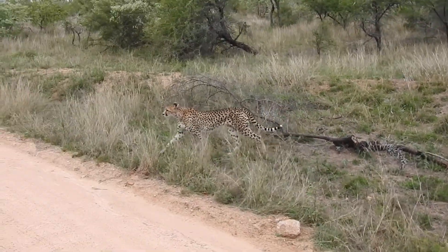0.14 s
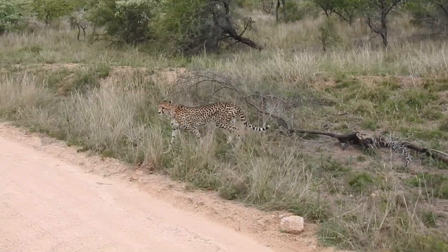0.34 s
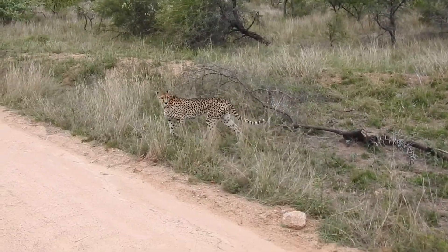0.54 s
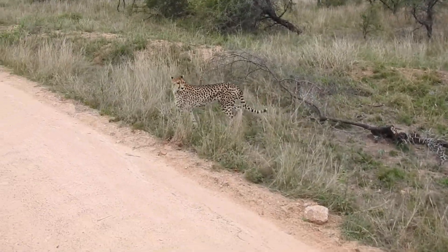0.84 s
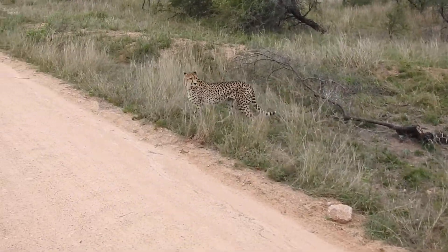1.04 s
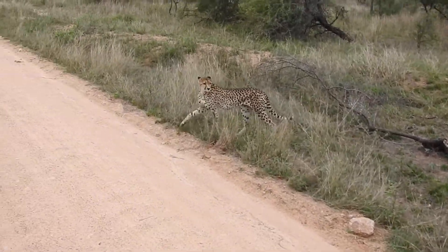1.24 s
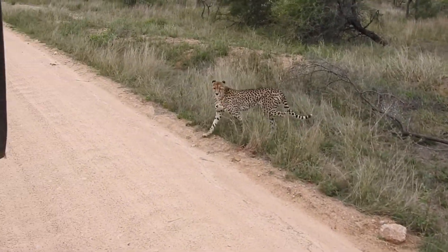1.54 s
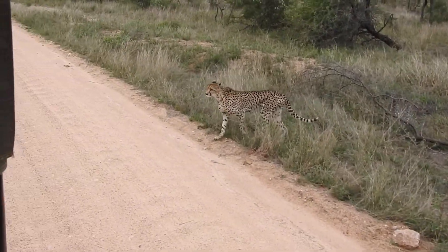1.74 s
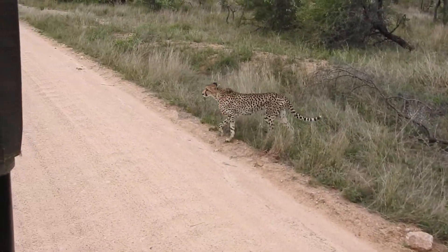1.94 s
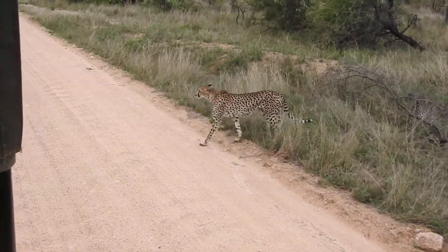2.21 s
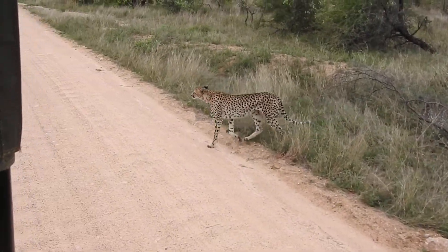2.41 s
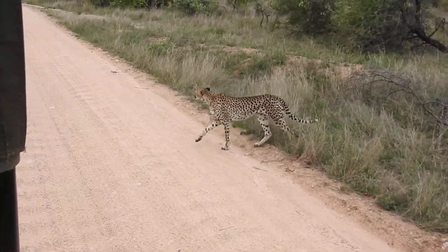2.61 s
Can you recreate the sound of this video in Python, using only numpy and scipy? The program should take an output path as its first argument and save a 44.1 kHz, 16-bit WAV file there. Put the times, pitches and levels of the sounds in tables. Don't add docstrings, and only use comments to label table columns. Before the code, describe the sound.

Thin, wavering, hoarse chirps from a cheetah close by, over a low idling diesel engine

```python
import sys
import numpy as np
from scipy import signal
from scipy.io import wavfile

SR = 44100
rng = np.random.default_rng(int(sys.argv[2]) if len(sys.argv) > 2 else 0)


def boost_factor(decibels):
    exponent = np.asarray(decibels, float) / 20
    return 10 ** exponent


def wav_record(signal):
    frames = np.transpose(np.atleast_2d(signal))
    bounded = np.clip(frames, -1, 1)
    quanta = np.round(bounded * 32767).astype(np.int16)
    wavfile.write(sys.argv[1], SR, quanta)


N = 122157


def rms_one(x):
    return x / np.sqrt(np.mean(np.abs(x) ** 2) + 1e-20)


def at_hz(points, hz):
    table_hz, value = np.array(points).T
    return np.interp(np.log(hz), np.log(np.maximum(table_hz, 1)), value)


def drift(rate_hz, size=N):
    r = np.exp(-2 * np.pi * rate_hz / SR)
    settle = SR // 2
    white = rng.standard_normal(size + settle)
    return rms_one(signal.lfilter([1], [1, -2 * r, r * r], white)[settle:])


def wobble(rate_hz, size):
    white = rng.standard_normal((2, size + 2000))
    low_pass = signal.butter(4, rate_hz, fs=SR, output="sos")
    real, imag = signal.sosfilt(low_pass, white)[:, 2000:]
    return rms_one(real + 1j * imag)


def resonance(x, hz, width_hz):
    r = np.exp(-np.pi * width_hz / SR)
    poles = [1, -2 * r * np.cos(2 * np.pi * hz / SR), r * r]
    return signal.lfilter([(1 - r * r) / 2, 0, (r * r - 1) / 2], poles, x)


def window(start, end, edge):
    t = np.arange(N) / SR
    return np.clip(np.minimum(t - start, end - t) / edge + .5, 0, 1)


def lean_gain(left_minus_right_db):
    half_db = left_minus_right_db / 2
    return boost_factor(np.array([[half_db], [-half_db]]))


def banded_noise(spectrum, patchy_db, likeness, leaning):
    edges = 30 * 2 ** np.arange(0, 9.6, .5)
    white = rng.standard_normal((2, 2, N))
    out = 0
    for k, (low, high) in enumerate(zip(edges, np.minimum(edges[1:], .45 * SR))):
        band = signal.butter(2, [low, high], "band", fs=SR, output="sos")
        mid, side = signal.sosfilt(band, white[k % 2])
        hz = np.sqrt(low * high)
        alike = np.clip(at_hz(likeness, hz), -1, 1)
        below_table_db = -60 * (hz < spectrum[0][0])
        gain = boost_factor(at_hz(spectrum, hz) + below_table_db + patchy_db * drift(11.8))
        pair = np.sqrt(1 + alike) * mid + np.sqrt(1 - alike) * side * [[1], [-1]]
        out = out + gain * lean_gain(at_hz(leaning, hz)) * pair
    return out


# pitch_hz, level_db
ROAD = [(60, 6.5), (170, -3.5), (500, -15), (1100, -16.5), (2500, -22.5), (7000, -22.5), (10000, -46.5),
        (15500, -74)]
# pitch_hz, left_right_likeness (-1 to 1)
ROAD_LIKENESS = [(60, 0.89), (150, 0.84), (500, 0.98), (2100, 0.46), (5000, -0.57)]
# pitch_hz, left_minus_right_db
ROAD_LEANING = [(200, -1), (1000, -7), (3000, 0), (8000, -14)]


def road():
    noise = banded_noise(ROAD, patchy_db=2.5, likeness=ROAD_LIKENESS, leaning=ROAD_LEANING)
    high_pass = signal.butter(2, 200, "high", fs=SR, output="sos")
    above = signal.sosfilt(high_pass, noise.mean(axis=0))
    return boost_factor(-38) * noise / np.std(above)


FIRING_PATTERN = [5, 3, 5, -11.5, 1.5, -0.5, 2, -9]
# pitch_hz, width_hz, level_db
PIPES = [(71.4, 6.7, -9), (100, 98, -15), (173.2, 11.3, 2), (360, 72, -11.5), (589, 122, -10.5)]


def engine():
    firing_hz, firing_spread_db = 49.38, 3
    turns = np.cumsum(firing_hz * (1 + 0.00634 * drift(1.57))) / SR
    hum = boost_factor(-34.5 + 0.79 * drift(4.0)) * np.sin(2 * np.pi * turns)
    octave = boost_factor(-43.5 + 2.0 * drift(14.0)) * np.sin(4 * np.pi * turns + 1.77)

    fired = np.flatnonzero(np.diff(np.floor(turns + .3)) > 0)
    pattern_db = np.array(FIRING_PATTERN)[np.arange(len(fired)) % 8]
    clicks = np.full(N, 1e-18)
    clicks[fired] = boost_factor(pattern_db + firing_spread_db * rng.standard_normal(400)[:len(fired)])
    clicks = signal.sosfilt(signal.butter(4, 2500, fs=SR, output="sos"), clicks)

    pipes, shake = 0, 0
    for k, (hz, width_hz, db) in enumerate(PIPES):
        pipes = pipes + (-1) ** k * boost_factor(db) * rms_one(resonance(clicks, hz, width_hz))
        shake = shake + boost_factor(db) * rms_one(resonance(rng.standard_normal(N), hz, 3.0 * width_hz))
    differing = boost_factor(-24) * rms_one(shake) * [[1], [-1]]
    return np.sqrt(2) * (hum + octave) + boost_factor(-40) * (pipes + differing)


# middle_s, length_s, level_db
RUSTLES = [
    (0.036, 0.12, -46),
    (0.0886, 0.012, -29),
    (0.115, 0.61, -32.5),
    (0.224, 0.15, -42),
    (0.968, .025, -31.5),
    (1.182, 0.046, -32.5),
    (1.65, 0.11, -39.5),
    (2.568, 0.037, -35),
    (1.41, .08, -44),
]
# pitch_hz, level_db (per Hz)
CLOTH = [(700, 1.5), (2000, -8), (4000, -2), (6800, 2), (9000, -40.5), (15500, -41)]


def rustle():
    t = np.arange(N) / SR
    swell = sum(boost_factor(db) * np.exp(-(2 * (t - s) / length) ** 2) for s, length, db in RUSTLES)
    likeness, leaning = [(1000, 1.0), (9000, 0.21)], [(1000, 3.6), (9000, 2.2)]
    noise = banded_noise(CLOTH, patchy_db=2.25, likeness=likeness, leaning=leaning)
    grain = boost_factor(2.2 * drift(100))
    return swell * grain * rms_one(noise)


def knock(s, db, hz, grit):
    t = np.maximum(np.arange(N) / SR - s, 0)
    width_hz = hz * 0.94
    noise = rms_one(resonance(resonance(rng.standard_normal(N), hz, width_hz), hz, width_hz))
    ring_s = 0.028 * (hz / 1000) ** -0.67
    onset = np.minimum(t * hz * 2, 1)
    ring = -np.sin(2 * np.pi * hz * t)
    return boost_factor(db - 60 * t / ring_s) * onset * (np.sqrt(1 - grit ** 2) * ring + grit * noise)


# start_s, peak_level_db, pitch_hz, left_minus_right_db
TICKS = [(.078, -17, 1790, 2.5), (.0905, -54, 6200, -11.5), (0.2023, -10.5, 1020, 10),
         (.2025, -43, 7000, -9), (0.211, -21.5, 6400, 2.5), (.269, -24, 2207, 28),
         (.2695, -27.5, 3910, 27.5), (0.28, -15, 4200, 19), (0.2782, -38, 8860, -1), (0.478, -25, 1380, 24),
         (0.477, -30, 3900, 23), (1.02, -25, 634, -1), (1.426, -24, 1970, 8.5), (1.432, -31, 3260, 21.5),
         (2.569, -30, 394, 9), (2.737, -27, 1440, 3.5), (.965, -35, 3280, 0)]
# start_s, peak_level_db, pitch_hz
THUDS = [(0.055, -14, 100), (0.198, -11.5, 105), (0.075, -16, 216), (0.195, -12, 212), (.196, -14, 397),
         (0.1951, -13, 530), (.2013, -10.5, 693), (.218, -17.5, 74), (1.018, -22, 110), (1.159, -15, 135),
         (1.172, -21, 229), (2.66, -17.5, 130)]


def handling():
    ticks = sum(knock(s, db, hz, grit=0.73) * lean_gain(pan) for s, db, hz, pan in TICKS)
    thuds = [sum(knock(*row, grit=0.44) for row in THUDS) for port in range(2)]
    return ticks + np.array(thuds) * lean_gain(5)


# start_s, peak_level_db, left_minus_right_db
CLICKS = [
    (0.09, -32, 0),
    (0.2024, -4.5, 10),
    (0.28, -23, -4),
    (0.48, -15, 22.5),
]


def snaps():
    t = np.arange(N) / SR
    half_width_s = 0.00006
    return sum(-boost_factor(db) * lean_gain(pan) * np.exp(-((t - s) / half_width_s) ** 2) for s, db, pan in CLICKS)


# pitch_hz, level_db
TRACT = [(2700, -16.5), (3350, -28), (4250, -8.5), (6300, 17.5), (7600, 25), (9000, 5), (11500, -15.5),
         (15500, -36)]


def chirp(rows, halves, hoarseness):
    flutter_hz, hoarse_hz, wander_hz = 200, 750, 45
    flutter_share, edge_s = .25, .005
    s, hz, db = np.transpose(rows)
    first = max(int((s[0] - edge_s) * SR), 0)
    last = min(int((s[-1] + edge_s) * SR), N)
    t, n = np.arange(first, last) / SR, last - first

    pitch, level_db = np.interp(t, s, hz), np.interp(t, s, db)
    hoarse = np.clip(hoarseness[first:last], 0, 1)
    wander = (0.0033 + 0.016 * hoarse) * drift(wander_hz)[first:last]
    phase = 2 * np.pi * np.cumsum(pitch * (1 + wander)) / SR
    soft = np.clip(flutter_share + hoarse, 0, 1)
    out, power = np.zeros(n), 1e-12
    for k in np.arange(1, 7, .5):
        partial_hz = k * pitch
        clear = np.sqrt(1 - soft ** 2) + soft * wobble(flutter_hz, n)
        wide = np.clip(2 * hoarse - 1, 0, 1) * np.clip(partial_hz / 8000, 0, 1)
        shape = np.sqrt(1 - wide ** 2) * clear + wide * wobble(hoarse_hz, n)
        audible = (partial_hz > 2400) * (partial_hz < .4 * SR)
        gain = boost_factor(at_hz(TRACT, partial_hz)) * audible * (halves[first:last] if k % 1 else 1)
        outer = np.abs(np.log2(partial_hz / 7000)) > .5
        gain = gain * boost_factor(-0.92 * (level_db + 18) * outer)
        out += gain * np.real(shape * np.exp(1j * k * phase))
        power = power + gain ** 2 / 2
    whole = np.zeros(N)
    whole[first:last] = out / np.sqrt(power) * boost_factor(level_db)
    return whole * window(s[0], s[-1], 2 * edge_s)


# start_s, pitch_hz, level_db
CHIRP_1 = [(.28, 2487, -22.5), (.316, 2510, -23), (.322, 4110, -30.5), (.345, 3680, -12), (.368, 3440, -30),
           (.378, 3494, -12.5), (.39, 3536, -18), (.405, 3600, -23.5), (.418, 3210, -17.5)]
CHIRP_2 = [(.4, 2050, -41.5), (0.429, 2162, -23.5), (0.454, 2229, -24), (0.468, 2362, -15),
           (0.496, 2224, -28.5), (0.524, 2211, -19), (0.557, 2290, -35), (0.587, 2190, -31.5),
           (0.618, 2100, -25.5)]
CHIRP_3 = [(0.561, 4203, -25), (0.609, 3834, -24.5), (0.618, 3707, -17.5), (0.647, 3216, -17),
           (0.686, 3290, -37)]
CHIRP_4 = [(0.691, 3563, -19), (0.721, 3480, -28.5), (.75, 3870, -35.5), (0.789, 3780, -38.5),
           (0.823, 3775, -35), (0.841, 3485, -22), (.885, 3260, -16.5), (.91, 3550, -23.5),
           (.925, 4100, -35)]
CHIRP_5 = [(0.926, 3990, -54), (.965, 4100, -39.5), (1.01, 3990, -40.5), (1.05, 4006, -39),
           (1.096, 3380, -25), (1.129, 3216, -46)]
CHIRP_6 = [(1.602, 11140, -52.5), (1.638, 8540, -42), (1.666, 8580, -36.5), (1.706, 7210, -29),
           (1.714, 6240, -26), (1.755, 5100, -44.5)]
CHIRP_7 = [(1.742, 4910, -36.5), (1.752, 3865, -20.5), (1.774, 4364, -29.5), (1.816, 4177, -26.5),
           (1.849, 4060, -29), (1.858, 4210, -32.5)]
CHIRP_8 = [(1.86, 4106, -28.5), (1.879, 3916, -19.5), (1.904, 3906, -15), (1.918, 3754, -24),
           (1.928, 3712, -8.5), (1.94, 3944, -20), (1.977, 3786, -19), (1.997, 4290, -35),
           (2.015, 4010, -18.5)]
CHIRP_9 = [(2.011, 3240, -21.5), (2.034, 2785, -33.5), (2.053, 2584, -22.5), (2.109, 2830, -31.5),
           (2.189, 2790, -31.5), (2.227, 3055, -29.5)]
CHIRP_10 = [(2.216, 2730, -24), (2.311, 2675, -28.5), (2.335, 3095, -25.5), (2.37, 2965, -33.5),
            (2.391, 2600, -27), (2.416, 2550, -28), (2.438, 2380, -29.5)]
CHIRP_11 = [(2.438, 2850, -33.5), (2.455, 2900, -30.5), (2.476, 2750, -24), (2.478, 2530, -19.5),
            (2.498, 2464, -37), (2.506, 2460, -25.5), (2.524, 2481, -32.5), (2.536, 2540, -25),
            (2.555, 2660, -35)]
CHIRP_12 = [(2.554, 2677, -27), (2.604, 2797, -32.5), (2.646, 2755, -28.5), (2.66, 2755, -28),
            (2.675, 3070, -28.5), (2.713, 3060, -25), (2.739, 2860, -33.5), (2.77, 3000, -20)]
# start_s, end_s, half_lines_level_db, hoarseness (0-1)
SPELLS = [(.28, .32, -4, .85), (.32, .42, -12, .66), (.42, .56, -22, .45), (.56, .74, -12, .66),
          (1.07, 1.14, -20, .7), (1.752, 1.86, -20, .88), (1.915, 1.98, -30, .45), (1.98, 2.03, -8, .85),
          (2.085, 2.22, -10, .2), (2.435, 2.476, -8, .58), (2.476, 2.535, -14, .5), (2.645, 2.74, -8, .76),
          (2.74, 2.78, -8, .45)]


def chirps():
    calm_hoarse = 0.087
    halves = sum(boost_factor(db) * window(a, b, 0.011) for a, b, db, _ in SPELLS)
    hoarseness = calm_hoarse + sum((h - calm_hoarse) * window(a, b, 0.0033) for a, b, _, h in SPELLS)
    calls = (CHIRP_1, CHIRP_2, CHIRP_3, CHIRP_4, CHIRP_5, CHIRP_6,
             CHIRP_7, CHIRP_8, CHIRP_9, CHIRP_10, CHIRP_11, CHIRP_12)
    direct = sum(chirp(rows, halves, hoarseness) for rows in calls)

    left_lag_s, cabin_t60_s = .000055, 0.12
    late = np.interp(np.arange(N) - left_lag_s * SR, np.arange(N), direct)
    t = np.arange(SR // 5) / SR
    tails = rng.standard_normal((2, len(t))) * boost_factor(-60 * t / cabin_t60_s) * (t > .002)
    tails = tails / np.sqrt(np.sum(tails[:1] ** 2))
    echoes = signal.fftconvolve(direct[None], tails, axes=1)[:, :N]
    port_gain = boost_factor(np.array([[-7.5], [6]]))
    return port_gain * (np.array([late, direct]) + boost_factor(-3) * echoes)


def scene():
    return road() + engine() + rustle() + handling() + snaps() + chirps()


def roll_off(x):
    return signal.sosfilt(signal.butter(12, 15850, fs=SR, output="sos"), x)


def record(dry):
    expanded = dry ** 3 / 3 + dry
    mix = .92 * np.tanh(expanded / .92)
    return roll_off(mix)


dry = scene()
out = record(dry)
wav_record(out)
```